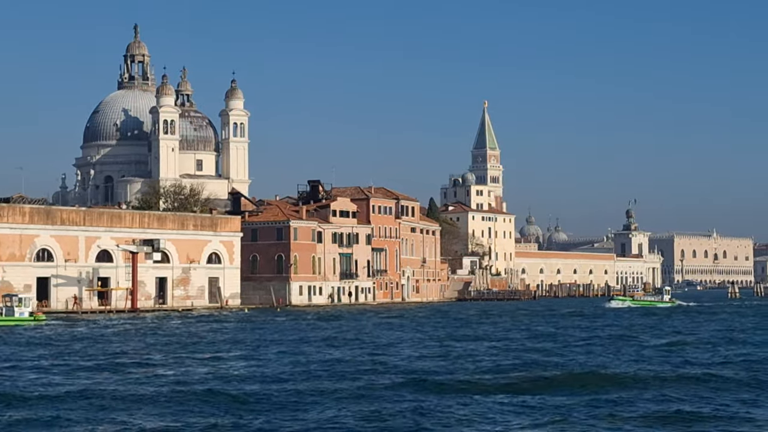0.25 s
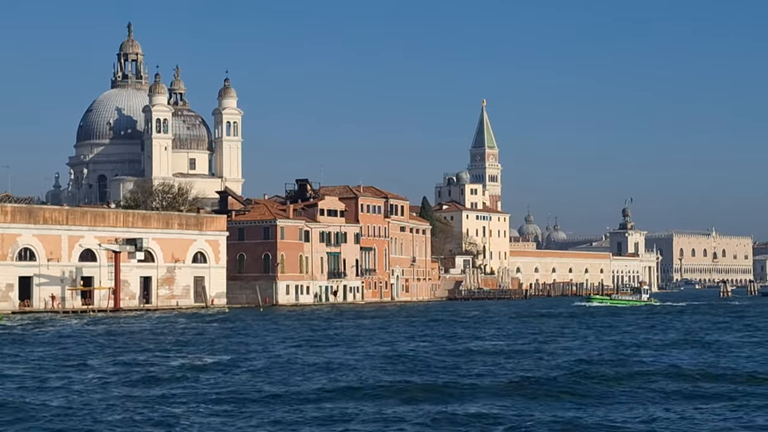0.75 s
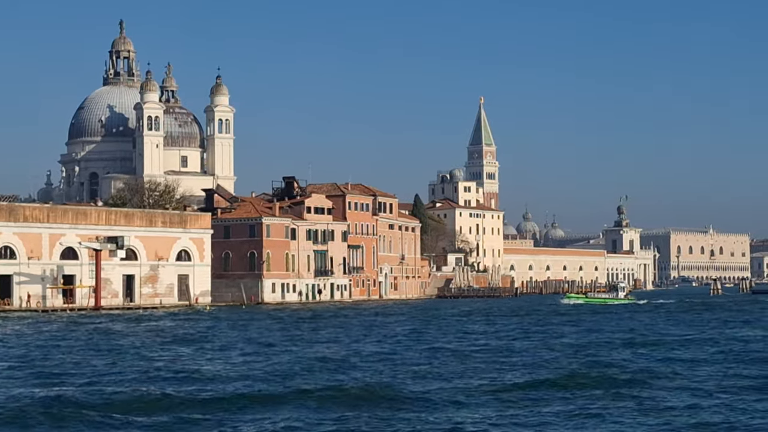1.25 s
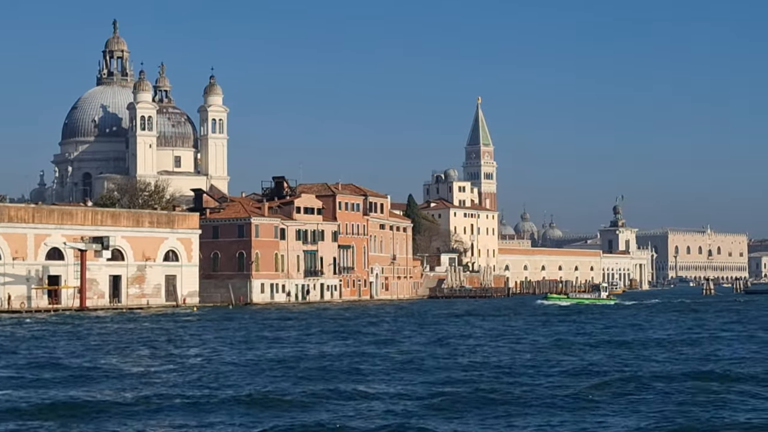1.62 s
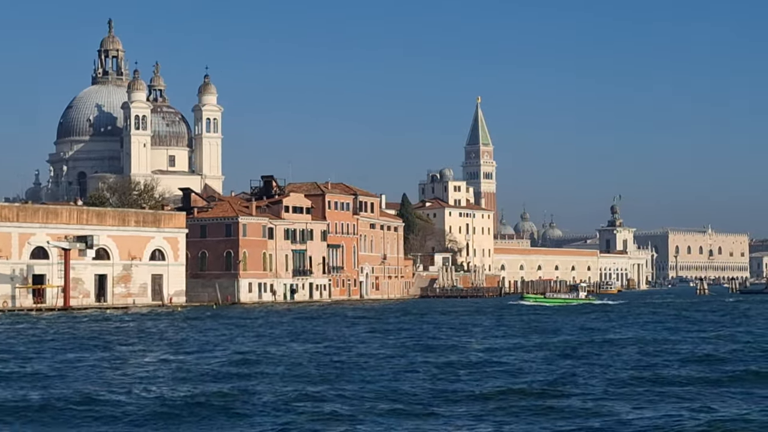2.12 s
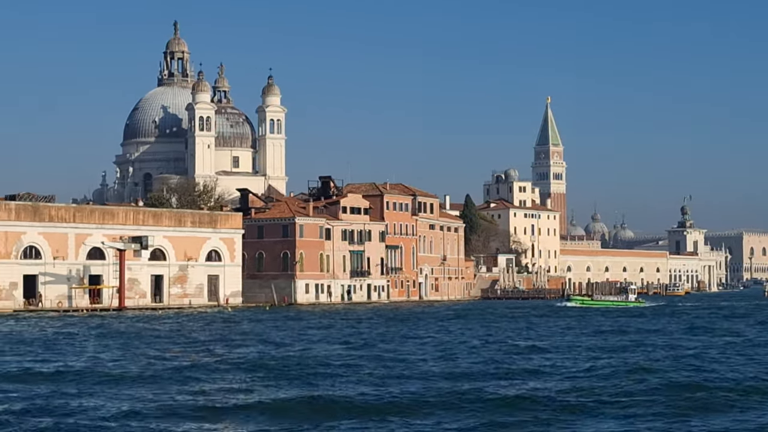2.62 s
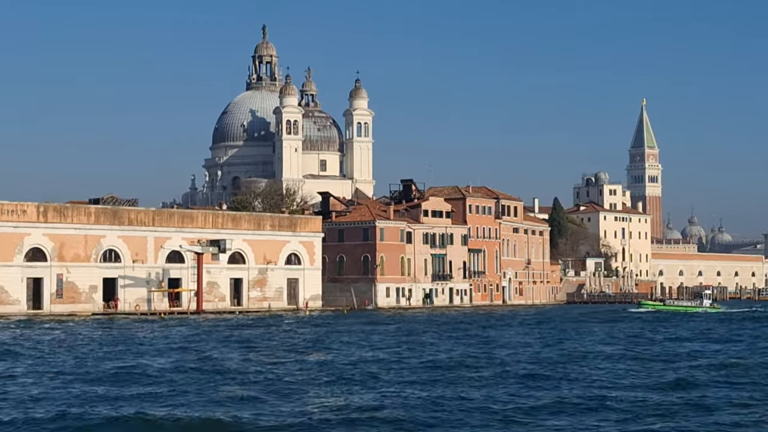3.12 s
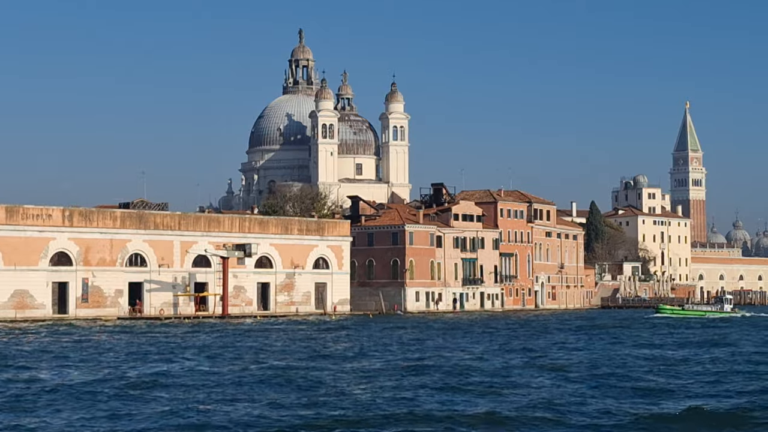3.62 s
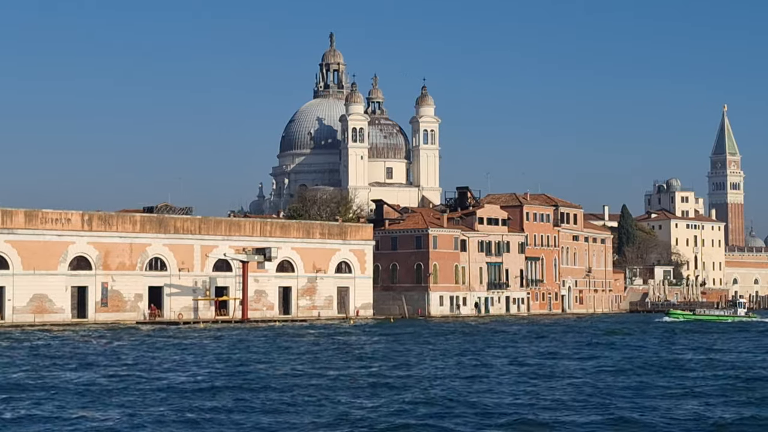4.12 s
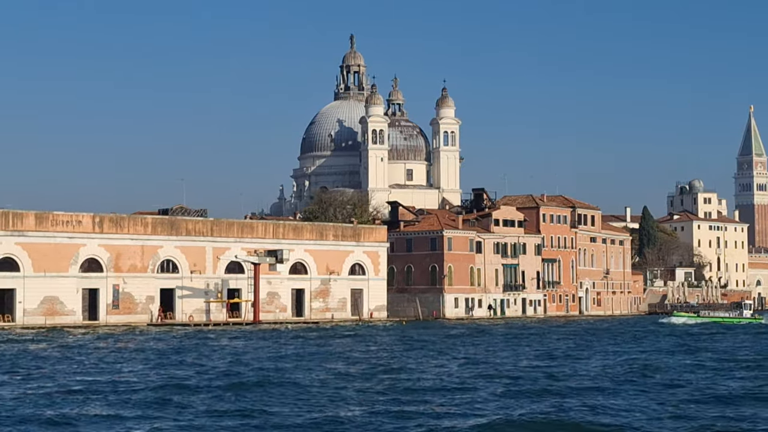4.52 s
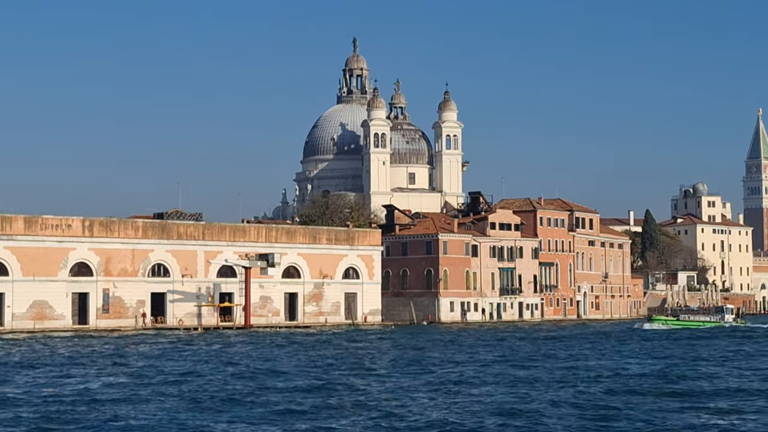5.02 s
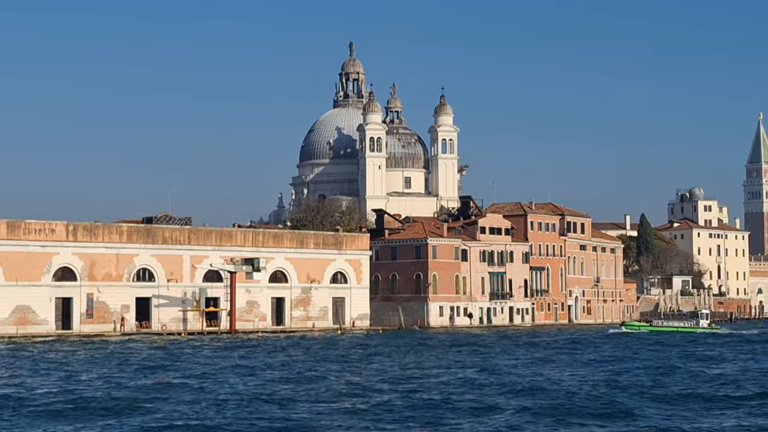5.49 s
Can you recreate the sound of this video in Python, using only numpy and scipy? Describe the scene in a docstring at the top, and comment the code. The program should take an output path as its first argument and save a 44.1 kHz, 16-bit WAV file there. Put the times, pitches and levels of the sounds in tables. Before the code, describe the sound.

On the open deck of a motor boat, two diesel engines run at a steady speed, their deep drone throbbing about five times a second. The hull rumbles and the propellers hum underneath. Slightly to the left, an exhaust burbles at the waterline, dulled now and then as waves cover it. Water hisses softly along the hull, and a light breeze brushes the microphone.

```python
"""Motor boat on choppy water

On the open deck, two six-cylinder diesels run at slightly different speeds, so their deep drone throbs
about five times a second. Propellers hum and the hull rumbles; a long swell loads and eases the engines.
The nearer exhaust burbles at the waterline, muffled as waves cover it.
Bursting bubbles hiss in the wash along the hull, and a light breeze brushes the microphones."""
import sys
import numpy as np
from scipy import signal
from scipy.fft import rfft, irfft
from scipy.io import wavfile

SR = 44100
rng = np.random.default_rng(int(sys.argv[2]) if len(sys.argv) > 2 else 0)


def dump(signal):
    """Clip the signal to [-1, 1] and save it as 16-bit WAV at the path in sys.argv[1]."""
    limited = np.clip(np.atleast_2d(signal).T, -1, 1)
    pcm = np.round(limited * 32767).astype(np.int16)
    wavfile.write(sys.argv[1], SR, pcm)


N = 253575


def from_db(db):
    """Decibels to gain."""
    return 10 ** (np.asarray(db) / 20)


def rms_one(x):
    """Scale to an rms of 1."""
    return x / np.sqrt(np.mean(x ** 2) + 1e-20)


def in_time(rows):
    """Breakpoints to envelopes, one for each column after the time."""
    times, *columns = np.transpose(rows)
    return [np.interp(np.arange(N) / SR, times, column) for column in columns]


def per_bin(points):
    """An EQ curve over log frequency, read at every FFT bin."""
    hz, values = np.transpose(points)
    bin_hz = np.arange(N // 2 + 1) * SR / N
    return np.interp(np.log(bin_hz + 1), np.log(hz), values)


def drift(rate_hz):
    """Smooth random modulation, rms 1."""
    hop, settle = 40, 2000
    r = np.exp(-2 * np.pi * rate_hz * hop / SR)
    white = rng.standard_normal(N // hop + settle + 2)
    slow = signal.lfilter([1], [1, -2 * r, r * r], white)[settle:]
    return np.interp(np.arange(N) / hop, np.arange(len(slow)), rms_one(slow))


def noise(db_per_bin):
    """Noise of a given colour, rms 1."""
    return rms_one(irfft(rfft(rng.standard_normal(N)) * from_db(db_per_bin), N))


def cut(x, hz, kind, order):
    """Butterworth low- or high-pass."""
    return signal.sosfilt(signal.butter(order, hz, kind, fs=SR, output="sos"), x)


def split(x, hz):
    """Crossover: the bands below and above a frequency."""
    low = signal.sosfiltfilt(signal.butter(4, hz, fs=SR, output="sos"), x)
    return low, x - low


def resonance(x, hz, width_hz):
    """Two-pole resonance with a peak gain of 1."""
    r = np.exp(-np.pi * width_hz / SR)
    poles = [1, -2 * r * np.cos(2 * np.pi * hz / SR), r * r]
    return signal.lfilter(np.array([1, 0, -1]) * (1 - r * r) / 2, poles, x)


def from_left(x, lag_s, pan_db=1.5):
    """A source to the left reaches the right microphone later and weaker."""
    late = np.interp(np.arange(N) - lag_s * SR, np.arange(N), x)
    return np.array([x, late]) * from_db([[pan_db / 2], [-pan_db / 2]])


def bumps(rows):
    """Each row rises and falls as a bell curve; one summed envelope for each dB column."""
    t = np.arange(N) / SR
    return sum(np.outer(db, np.exp(-((t - peak_s) / half_s) ** 2)) for peak_s, half_s, *db in rows)


def swell(period_s, easiest_s, swing_db):
    """Load on the engines as the hull climbs and descends the swell, in dB."""
    return -swing_db * np.cos(2 * np.pi * (np.arange(N) / SR - easiest_s) / period_s)


def cycles(rpm):
    """Four-stroke cycles completed: one for every two turns of the crank."""
    return np.cumsum(rpm) / (2 * 60 * SR)


def drone(cycle, engine, openness_db, lead, rough, rough_hz, wave_share):
    """One diesel's partials crest together once a firing; the upper ones flutter and follow the outlet."""
    # drone through the hull: multiple of the cycle rate, near engine level/dB, far engine level/dB
    partials = [(3, -49, -46), (4, -42, -43), (5, -46, -40), (6, -14, -19), (7, -44, -49), (8, -40, -50),
                (9, -22, -32.5), (12, -27.5, -38), (13, -41, -47), (14, -43, -52), (15, -31, -34),
                (18, -36, -47), (21, -40, -51), (24, -52, -62), (27, -50, -59), (30, -48, -63),
                (38, -47, -63)]
    cylinders, scatter_turns = 6, .05
    out = np.zeros(N)
    for multiple, near_db, far_db in partials:
        level_db = near_db if engine == "near" else far_db
        height = min(multiple / (3 * cylinders), 1.2)
        above_firing = multiple - cylinders
        start_turns = above_firing * lead + scatter_turns * rng.standard_normal() * (above_firing != 0)
        flutter = 1 + rough * height * (drift(rough_hz) + 1j * drift(rough_hz))
        gain = from_db(level_db + wave_share * height ** 2 * openness_db)
        tone = np.exp(2j * np.pi * (multiple * cycle + start_turns))
        out += np.sqrt(2) * gain * np.real(flutter * tone)
    return out


def propellers(rough, rough_hz):
    """Each propeller hums at its blade rate, wavering in the churned water."""
    # blades beating the water: f/Hz, level/dB
    blades = [(67.5, -33), (73.3, -29.5)]
    t = np.arange(N) / SR
    out = np.zeros(N)
    for hz, db in blades:
        flutter = 1 + rough * (drift(rough_hz) + 1j * drift(rough_hz))
        tone = np.exp(2j * np.pi * (hz * t + rng.random()))
        out += np.sqrt(2) * from_db(db) * np.real(flutter * tone)
    return out


def hull_rumble(load_db, openness_db, level_db, upper_db, follows):
    """The hull rumbles harder under load; its upper band opens up as the outlet clears."""
    # colour of the rumble: f/Hz, relative level/dB
    colour = [(20, -22.5), (38, -18.5), (52, -0.5), (70, -5), (90, -10), (120, -9), (160, 3), (245, 1.5),
              (330, -4), (450, -5.5), (800, -5), (1200, -19.5), (2000, -23), (6000, -99)]
    deep, upper = split(noise(per_bin(colour)), hz=320)
    return from_db(level_db + load_db) * (deep + from_db(upper_db + follows * openness_db) * upper)


def pulses(cycle, pattern, uneven_db, jitter_s=.00004):
    """Clicks at set moments of every cycle, a little uneven in time and strength."""
    moment, level_db = np.transpose(pattern)
    whole_cycles = np.arange(int(cycle[-1]) + 1)[:, None]
    chance = rng.standard_normal((whole_cycles.size * len(moment), 2))
    at = np.interp((whole_cycles + moment).ravel(), cycle, np.arange(N), right=2 * N)
    at += jitter_s * SR * chance[:, 0]
    size = from_db(np.tile(level_db, whole_cycles.size) + uneven_db * chance[:, 1])
    heard = (at >= 0) & (at < N)
    return np.bincount(at[heard].astype(int), size[heard], N)


def exhaust(cycle, load_db, burble_db, bark_db):
    """Each cylinder puffs into the ringing pipe, trailing turbulence; one knocks, harder under load."""
    # one puff for each cylinder: delay/cycles, level/dB
    firings = [(-.012, -4), (.193, -4), (.326, -4.5), (.498, -4.5), (.65, -8.5), (.843, -6)]
    # pipe resonances: f/Hz, width/Hz, level/dB
    modes = [(417, 220, 1.5), (597, 110, 6.5), (696, 76, 11), (846, 63, -5), (920, 130, -29.5)]
    gurgle, gas_decay_s = .33, .0027
    knock_hz, knock_width_hz, knock_db = 775, 200, -2.8 + .7 * load_db
    puffs = pulses(cycle, firings, uneven_db=1.2)
    gas = signal.lfilter([1], [1, -np.exp(-1 / (gas_decay_s * SR))], puffs)
    flow = rms_one(puffs) + gurgle * rms_one(gas * rng.standard_normal(N))
    pipe = sum(from_db(db) * resonance(flow, hz, width) for hz, width, db in modes)
    knock = resonance(pulses(cycle, firings[:1], uneven_db=1.6), knock_hz, knock_width_hz)
    knock = resonance(knock, knock_hz, knock_width_hz)   # a second pass rounds the attack
    outlet = rms_one(pipe) + from_db(knock_db) * rms_one(knock)
    outlet = cut(outlet, 360, "high", order=4)
    outlet = cut(outlet, 871, "low", order=6)
    burble, bark = split(outlet, hz=537)
    return from_db(burble_db) * rms_one(burble) + from_db(bark_db) * rms_one(bark)


def water(wash_db, spray_db, churn_db, fizz_db):
    """Countless bursting bubbles merge into a wide stereo hiss that swells slightly now and then."""
    # rush along the hull, the fader over wash and spray: t/s, level/dB
    rush = [(0.1, -47), (0.14, -47), (0.72, -48.5), (3.41, -48), (5.53, -46.5), (5.65, -47)]
    # colour of wash and spray: f/Hz, relative level/dB
    colour = [(500, 0.5), (1100, 3.5), (1600, -3.5), (2400, -1.5), (3600, -5.5), (4400, -7), (5200, -10),
              (6600, -11.5), (7600, -7), (8100, -11.4), (8700, -18), (10500, -14.5), (13500, -15),
              (15300, -14.5)]
    # pan of the water: f/Hz, left minus right/dB
    pan = [(1200, -2.5), (2400, -7), (3500, -4), (4600, -4), (6300, 4), (7800, 1.5), (10000, -3),
           (13500, -3.5), (15500, 7)]
    # brief, slight swells in the water's hiss: t/s, half length/s, lift/dB
    lifts = [(3.82, .07, 1.8), (4.04, .05, 2.3), (4.293, .037, 1.8), (4.79, .05, 2.2), (5.317, .05, 1.5)]
    rush_db, = in_time(rush)
    lift_db, = bumps(lifts)
    hiss = np.array([noise(per_bin(colour) + side * per_bin(pan) / 2) for side in (1, -1)])
    wash, spray = split(hiss, hz=5800)
    churn = churn_db * np.array([drift(32), drift(29)])
    fizz = fizz_db * np.array([drift(150), drift(150)])
    wash = from_db(wash_db + lift_db + churn) * rms_one(wash)
    spray = from_db(spray_db + fizz) * rms_one(spray)
    return from_db(rush_db) * (wash + spray)


def breeze(level_db):
    """Light wind rumbles on each microphone separately."""
    # colour of the breeze: f/Hz, relative level/dB
    colour = [(20, -15), (60, 0), (140, -11.5), (300, -5), (700, -30), (1500, -58.5)]
    return from_db(level_db) * np.array([noise(per_bin(colour)), noise(per_bin(colour))])


def scene():
    """Engines, propellers, hull and exhaust sit a little to the left, with water and breeze all round."""
    # engine speeds: t/s, near engine/rpm, far engine/rpm
    speeds = [(0.0, 1955.8, 2051.6), (0.8, 1950.2, 2046.7), (1.6, 1952.9, 2050.0), (2.4, 1951.8, 2046.3),
              (3.2, 1952.9, 2047.4), (4.0, 1952.3, 2046.9), (4.8, 1957.7, 2048.8), (5.75, 1954.9, 2048.4)]
    # waves washing over the outlet: t/s, half length/s, burble loss/dB, bark loss/dB (negative lifts)
    waves = [(.76, 0.32, 4, 3.5), (1.55, .2, -1, 6), (2.52, 0.11, 4, -3.7), (2.88, 0.32, 4.5, 2),
             (3.86, .18, 3.5, 13), (4.66, 0.17, 12.5, 0.5), (5.1, 0.085, 7.5, 2.5)]
    near_rpm, far_rpm = in_time(speeds)
    near, far = cycles(near_rpm), cycles(far_rpm)
    far = far - far[round(.0017 * SR)]   # the far cycle starts 1.7 ms late
    load_db = swell(period_s=2.95, easiest_s=1.27, swing_db=1.0)
    burble_loss_db, bark_loss_db = bumps(waves)
    openness_db = burble_loss_db.mean() - burble_loss_db   # how far the outlet stands clear of the waves
    engines = drone(near, "near", openness_db, lead=.1037, rough=.17, rough_hz=7.0, wave_share=.49)
    engines += drone(far, "far", openness_db, lead=-.011, rough=.33, rough_hz=2.4, wave_share=.2)
    hum = from_db(load_db) * engines + propellers(rough=.27, rough_hz=3)
    rumble = hull_rumble(load_db, openness_db, level_db=-32.3, upper_db=-2, follows=1.3)
    puffs = exhaust(near, load_db, burble_db=-42 - burble_loss_db, bark_db=-35.5 - bark_loss_db)
    hiss = water(wash_db=4.5, spray_db=-3.5, churn_db=1.0, fizz_db=1.1)
    wind = breeze(level_db=-39)
    return from_left(hum, lag_s=.00019) + from_left(puffs + rumble, lag_s=.00031) + hiss + wind


def record(dry):
    """A steep low-pass takes off the top above 15.8 kHz."""
    return signal.sosfilt(signal.ellip(12, .1, 90, 15800, fs=SR, output="sos"), dry)


dry = scene()
out = record(dry)
dump(out)
```